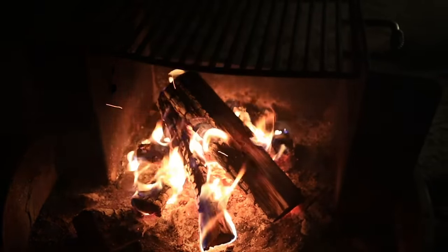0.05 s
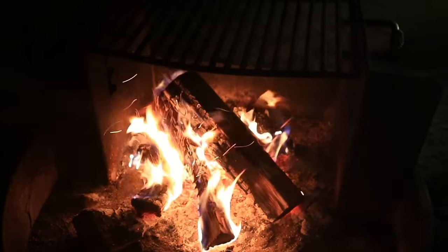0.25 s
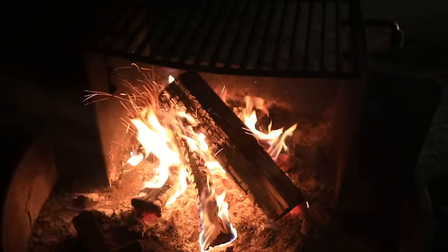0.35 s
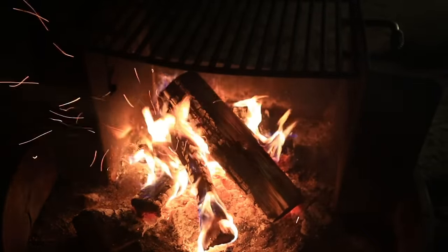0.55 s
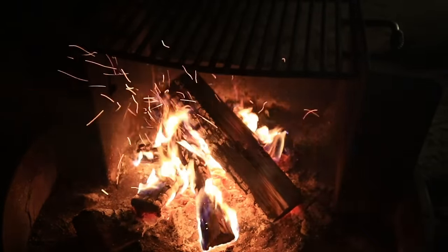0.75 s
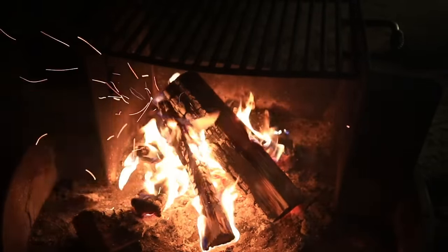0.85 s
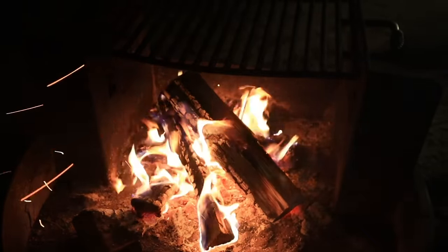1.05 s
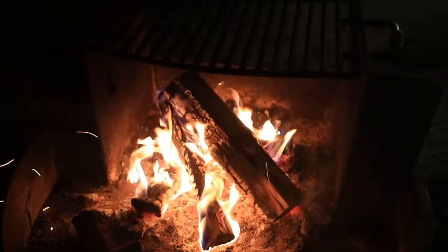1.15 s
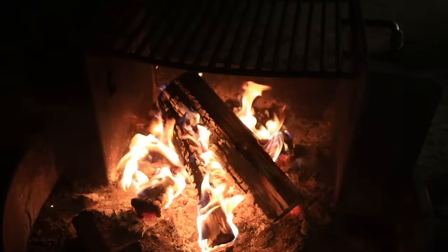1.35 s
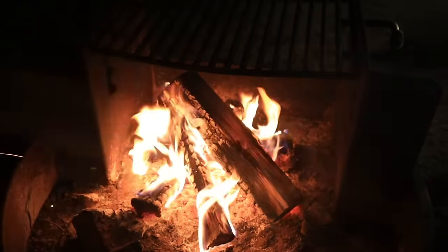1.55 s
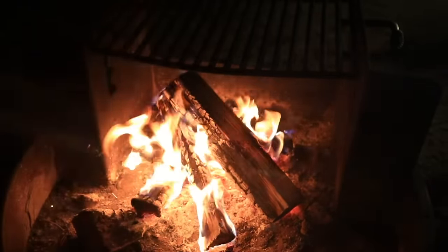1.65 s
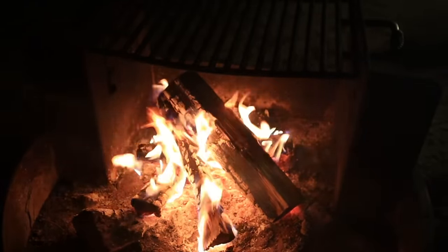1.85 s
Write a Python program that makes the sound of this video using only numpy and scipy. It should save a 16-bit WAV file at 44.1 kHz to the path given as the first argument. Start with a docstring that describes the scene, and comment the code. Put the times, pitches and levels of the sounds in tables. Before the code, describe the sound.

A wood fire in a steel ring, heard close and nearly mono: soft low rush, one overloading dry crack almost at once, a quiet gap, then a loose run of small splintery pops over a faint engine-like hum.

```python
"""A wood fire burns in an open steel fire ring at night, heard up close and nearly in mono.
One log cracks loudly: a single blow sets damped tones ringing, and dense echoes follow.
Small pops are short rings with a splintery snap, ticks are tiny rings, and sap sizzles as grainy noise.
The steel walls scatter the crack and the small sounds. Shaped noise makes a low rush, a faint hiss,
a deep rumble and a brief puff of air; a wavering tone over blurred partials hums like a far engine."""
import sys
import numpy as np
from scipy import signal
from scipy.fft import rfft, irfft
from scipy.io import wavfile

SR = 44100
rng = np.random.default_rng(int(sys.argv[2]) if len(sys.argv) > 2 else 0)


def dump(signal):
    """Clip the signal to [-1, 1] and save it as 16-bit WAV at the path in sys.argv[1]."""
    limited = np.clip(np.atleast_2d(signal).T, -1, 1)
    pcm = np.round(limited * 32767).astype(np.int16)
    wavfile.write(sys.argv[1], SR, pcm)


N = 83790   # length in samples
TIME = np.arange(N) / SR   # seconds

# Tone colour of the echoes from the steel walls: f/Hz, relative level/dB
WALL_SPECTRUM = [(230, -6), (480, -29), (850, 2.5), (3000, -3.5), (4500, -3.5), (8500, -7), (10600, 0.5),
                 (13500, -9), (15800, -5)]
WALL_DELAY_S = 0.0012


def from_db(db):
    """Turn decibels into a gain."""
    return 10 ** (np.asarray(db) / 20)


def rms_one(x):
    """Scale a signal so that its rms (its average strength) is 1."""
    return x / np.sqrt(np.mean(x ** 2) + 1e-20)


def butter(x, hz, kind, order=2):
    """Keep what lies below ("low") or above ("high") a frequency; a higher order cuts more steeply."""
    sos = signal.butter(order, np.clip(hz, 10, .45 * SR), kind, fs=SR, output="sos")
    return signal.sosfilt(sos, x + 1e-18)


def shaped_noise(gain):
    """Random noise with each frequency scaled by its own gain; rms 1."""
    return rms_one(irfft(rfft(rng.standard_normal(N)) * gain, N))


def noise(spectrum):
    """Steady noise whose tone colour follows a table of frequencies and levels; rms 1."""
    hz, db = np.transpose(spectrum)
    bins_hz = np.fft.rfftfreq(N, 1 / SR)
    return shaped_noise(from_db(np.interp(np.log(bins_hz + 1), np.log(hz), db)))


def resonant_noise(hz, width_hz):
    """Noise gathered around one frequency, as by two equal resonances (at 0 Hz: a drift); rms 1."""
    bins_hz = np.fft.rfftfreq(N, 1 / SR)
    return shaped_noise(1 / (1 + (2 * (bins_hz - hz) / width_hz) ** 2))


def click(s):
    """A single sample of height 1 at the given time."""
    return 1.0 * (np.arange(N) == round(s * SR))


def decay(t60):
    """A fade from 1 that falls by 60 dB in t60 seconds."""
    return np.exp(-np.log(1000) * TIME / t60)


def ring(clicks, hz, t60):
    """Each click strikes a resonance: a sine that fades by 60 dB in t60 seconds."""
    shrink = np.exp(-np.log(1000) / (t60 * SR))   # per sample
    turn = 2 * np.pi * hz / SR   # radians per sample
    return signal.lfilter([0, np.sin(turn)], [1, -2 * shrink * np.cos(turn), shrink ** 2], clicks + 1e-18)


def reflections(x, spectrum, level_db, t60, delay_s):
    """Dense echoes, built from noise, that start after a delay and die away."""
    echoes = noise(spectrum) * decay(t60) * (TIME > delay_s)
    return from_db(level_db) * signal.fftconvolve(x, rms_one(echoes) / np.sqrt(N))[:N]


def rush():
    """Steady low noise whose level flutters gently, with a faint steady hiss above it."""
    # tone colour of the low rush: f/Hz, relative level/dB
    rush_spectrum = [(20, -20), (55, -17), (90, -1), (130, 4), (190, -1.5), (330, 0.5), (420, -1.5),
                     (640, 2.5), (850, 1), (1080, -3.5), (1300, -11), (1600, -24), (2500, -26.5),
                     (5000, -63)]
    # tone colour of the hiss: f/Hz, relative level/dB
    hiss_spectrum = [(500, 7), (1800, -3.5), (3000, 2.5), (4500, 0), (6500, -2.5), (10000, -3),
                     (15500, -5.5)]
    rush_db, hiss_db = -41.5, -60
    flutter_db = 0.45 * resonant_noise(0, width_hz=72)
    low = from_db(rush_db + flutter_db) * noise(rush_spectrum)
    return low + from_db(hiss_db) * noise(hiss_spectrum)


def rumble():
    """Deep air noise that slowly settles under the rush."""
    start_db, fade_db_per_s, top_hz = -53.5, 6, 70.4
    deep = rms_one(butter(rng.standard_normal(N), top_hz, "low"))
    return from_db(start_db - fade_db_per_s * TIME) * deep


def hum():
    """A low tone, wavering in pitch and level, over three blurred partials made of narrow noise."""
    # level of the wavering tone before its flutter: t/s, level/dB
    drone_levels = [(0, -52), (.15, -50), (.48, -46.5), (.65, -56), (.85, -55.5), (1.02, -47), (1.45, -57),
                    (1.9, -49.5)]
    # the blurred partials: f/Hz, level/dB, width/Hz
    partials = [(77.2, -58, 6), (98.1, -58.5, 4), (130.5, -54.5, 18)]
    drone_hz, waver_hz, flutter_db = 146.5, 3.29, 3.5   # the last two are rms swings
    pitch_hz = drone_hz + waver_hz * resonant_noise(0, width_hz=13.1)
    level_db = np.interp(TIME, *np.transpose(drone_levels))
    level_db = level_db + flutter_db * resonant_noise(0, width_hz=55)
    tone = np.sin(2 * np.pi * np.cumsum(pitch_hz) / SR)
    drone = from_db(level_db) * rms_one(tone)
    return drone + sum(from_db(db) * resonant_noise(hz, width) for hz, db, width in partials)


def ticks():
    """Tiny bursts at random moments in the embers, each ringing for a few cycles."""
    ticks_per_s, smallest_db, spread_db, fade_cycles = 60, -60, 1, 12
    sizes = from_db(smallest_db + spread_db * np.minimum(rng.exponential(1, N), 3))
    clicks = sizes * (rng.random(N) < ticks_per_s / SR)
    pitches_hz = np.geomspace(1900, 5500, 12)
    dealt = rng.integers(0, len(pitches_hz), N)   # which pitch a tick gets
    return sum(ring(clicks * (dealt == k), hz, fade_cycles / hz) for k, hz in enumerate(pitches_hz))


def puff():
    """A brief soft rumble of air on the microphone: deep noise that swells and fades."""
    peak_s, half_length_s, level_db, top_hz = 0.05, 0.028, -41, 70.6
    swell = np.exp(-((TIME - peak_s) / half_length_s) ** 2)
    air = rms_one(butter(rng.standard_normal(N), top_hz, "low", order=4))
    return from_db(level_db) * swell * air


def pops():
    """Each small burst gives a splintery snap and two short rings of the wood; slower bursts are duller."""
    # the pops: t/s, main ring f/Hz, its level/dB, second ring f/Hz, its level/dB,
    # 60 dB fade time of both rings/s, snap level/dB, top of the burst f/Hz
    pop_list = [(0.0178, 2500, -42.5, 4200, -61, 0.0077, -54, 5000),
                (0.83, 2700, -46, 10200, -47, 0.0058, -41, 15000),
                (0.843, 4000, -31.5, 12600, -35.5, 0.0022, -31, 13500),
                (0.878, 3300, -50, 4470, -49, .006, -39, 13000),
                (.9640, 4540, -35.5, 6300, -44, 0.0036, -29, 10500),
                (.9961, 2480, -27.5, 7000, -35.5, 0.0026, -32, 9000),
                (1.1105, 2240, -52, 4040, -88, .008, -56, 6000),
                (1.1345, 4300, -45, 6200, -48, 0.0072, -48, 8950),
                (1.2019, 2500, -21, 4420, -25, 0.0045, -22, 6660),
                (1.2032, 1860, -25.5, 1470, -44, .010, -50, 3960),
                (1.2543, 2580, -38, 2000, -50, 0.0068, -54, 4000),
                (1.2841, 3250, -32.5, 11100, -43, 0.0033, -26.5, 14100),
                (1.3314, 2220, -43.5, 2800, -44.5, 0.0076, -59, 4000),
                (1.611, 2100, -52, 2900, -51, .012, -58, 4000),
                (1.6434, 2800, -42, 2120, -61, 0.015, -58, 5000),
                (1.6960, 2720, -46.5, 3400, -48, 0.007, -52, 5000),
                (1.8870, 2650, -30, 3370, -35, .0045, -28, 14100)]
    splinter_db, splinter_t60, snap_low_hz = 2.5, 0.0072, 2800
    out = np.zeros(N)
    for s, main_hz, main_db, second_hz, second_db, t60, snap_db, top_hz in pop_list:
        burst = butter(click(s), top_hz, "low", order=3)
        out += from_db(main_db) * ring(burst, main_hz, t60)
        out += from_db(second_db) * ring(burst, second_hz, t60)
        # fibres tearing just after the burst
        fibres = rng.standard_normal(N) * decay(splinter_t60)
        tearing = signal.fftconvolve(burst, fibres / np.linalg.norm(fibres))[:N]
        snap = burst + from_db(splinter_db) * tearing
        out += from_db(snap_db) * butter(snap, snap_low_hz, "high")
    return out


def crack():
    """A steam pocket splits the log: one overloading blow rings damped tones, then broadband echoes."""
    # what the splitting log rings with: f/Hz, level relative to the blow/dB, 60 dB fade time/s
    log_modes = [(1006, -2, 0.0038), (1750, -6.5, 0.0024), (2730, -3.5, 0.0028), (4690, -1.5, 0.0031),
                 (8000, -2.5, 0.0017), (10200, -3, 0.0019), (11850, -8, 0.0017)]
    # tone colour of the longer tail in the surroundings: f/Hz, relative level/dB
    tail_spectrum = [(150, -11), (700, 7), (3200, 5), (5500, 1), (9000, -4), (12400, 1.5), (15500, -9)]
    crack_s, blow_db = .1765, 4.5
    low_hz, top_hz, overload = 446, 13600, 0.79   # overload: height at which the microphone gives in
    blow = from_db(blow_db) * click(crack_s)
    log = np.zeros(N)
    for k, (hz, db, t60) in enumerate(log_modes):
        sign = (-1) ** (k + 1)   # neighbouring tones start in opposite directions
        log += sign * from_db(db) * ring(blow, hz, t60)
    near = reflections(blow, WALL_SPECTRUM, level_db=-3, t60=0.015, delay_s=WALL_DELAY_S)
    far = reflections(blow, tail_spectrum, level_db=-17.5, t60=0.18, delay_s=0.0053)
    squashed = overload * np.tanh(log / overload)
    direct = butter(squashed, top_hz, "low", order=4)
    return butter(direct, low_hz, "high") + near + far


def sizzle():
    """Sap boils out as a grainy jet of steam: noise around one pitch that swells and dies."""
    peak_s, rise_s, fall_s, level_db = 0.804, 0.093, 0.16, -60
    swell = np.exp(np.minimum((TIME - peak_s) / rise_s, (peak_s - TIME) / fall_s))
    grain = from_db(4.3 * resonant_noise(0, width_hz=340))   # quick random changes of level
    steam = resonant_noise(2500, width_hz=1400)
    return from_db(level_db) * swell * rms_one(grain * steam)


def scene():
    """Fire and background in the centre, with a trace of hiss that is opposite in the two channels."""
    crackle = pops() + ticks() + sizzle()
    # the same walls answer the small sounds
    echo = reflections(crackle, WALL_SPECTRUM, level_db=-14.5, t60=.035, delay_s=WALL_DELAY_S)
    side = from_db(-72.5) * butter(rng.standard_normal(N), 4400, "high")
    centre = crack() + crackle + echo + rush() + rumble() + hum() + puff()
    return centre + np.array([side, -side])


def record(dry):
    """A steep filter removes the very top of the treble."""
    cutoff_hz = 15800
    return signal.sosfilt(signal.ellip(10, .1, 80, cutoff_hz, fs=SR, output="sos"), dry)


dry = scene()
out = record(dry)
dump(out)
```